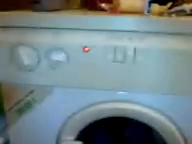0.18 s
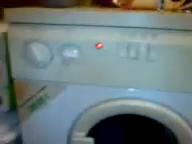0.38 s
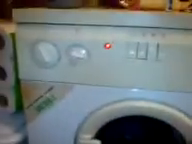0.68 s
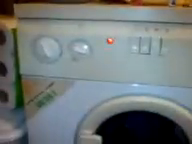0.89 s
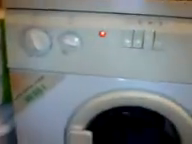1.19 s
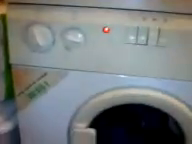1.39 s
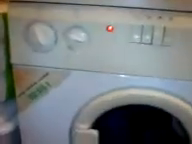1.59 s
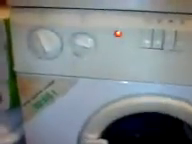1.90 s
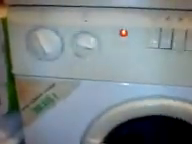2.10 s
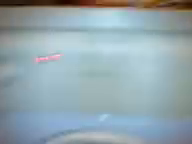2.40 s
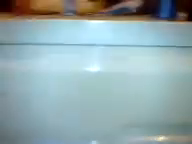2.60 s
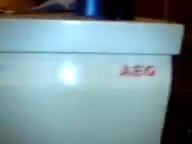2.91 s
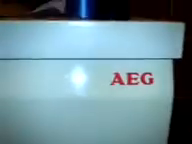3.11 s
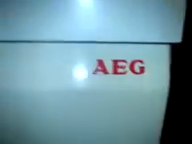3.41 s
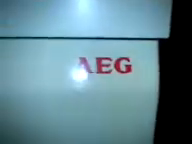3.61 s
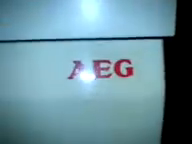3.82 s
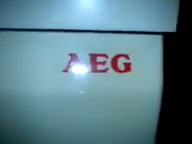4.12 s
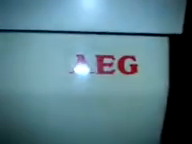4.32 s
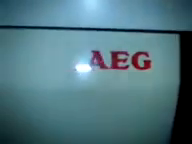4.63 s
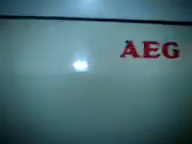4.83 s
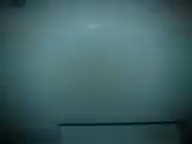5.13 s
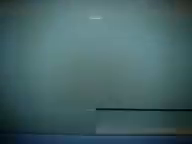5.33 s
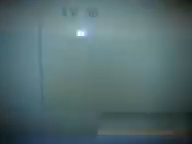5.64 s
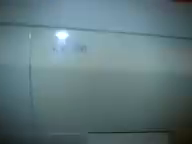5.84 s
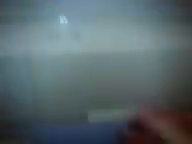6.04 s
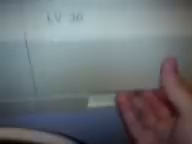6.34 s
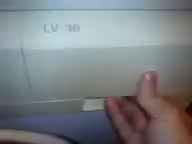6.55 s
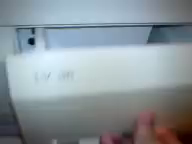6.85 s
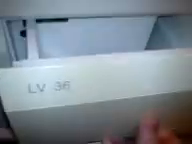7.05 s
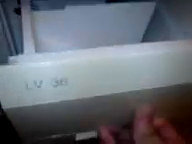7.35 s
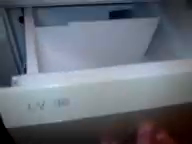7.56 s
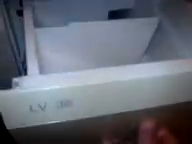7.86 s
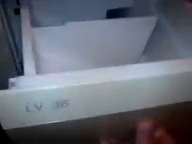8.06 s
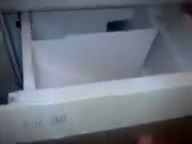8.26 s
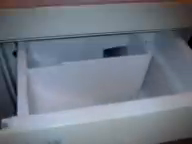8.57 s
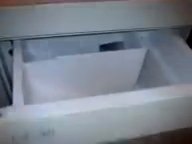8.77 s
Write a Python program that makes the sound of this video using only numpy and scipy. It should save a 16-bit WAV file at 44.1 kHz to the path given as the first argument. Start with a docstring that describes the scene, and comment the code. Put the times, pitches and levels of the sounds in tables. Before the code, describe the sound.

A washing machine fills indoors, heard close through a narrow, dull-topped microphone moving along its front. A steady, whistling inlet hiss dominates, with fizzing jets and low gurgling that slowly grow. The splash dims near the closed detergent drawer, then the drawer jerks open with a hollow plastic knock and short rattle, letting out fuller spattering and drumming water.

```python
"""Washing machine filling

A washing machine fills with mains water, heard by a microphone that moves along its front.
The inlet valve hisses and rings, and the cabinet passes the hiss on. Jets fizz and spatter in the plastic
detergent drawer; water gurgles down to the tub. Near 7 s a hand pulls the drawer open with a knock.
The narrow-band microphone rounds the loudest peaks; faint sharp ticks lie above its band.
Noise and impacts drive resonances, decaying tones make bubbles and knocks, tables set the levels."""
import sys
import numpy as np
from scipy import signal
from scipy.fft import rfft, irfft, next_fast_len
from scipy.io import wavfile

SR = 44100
rng = np.random.default_rng(int(sys.argv[2]) if len(sys.argv) > 2 else 0)


def to_wav(s):
    """Save 16-bit WAV."""
    ch = np.atleast_2d(s).T  # columns
    pcm = np.round(np.clip(ch, -1, 1) * 32767)  # PCM
    wavfile.write(sys.argv[1], SR, pcm.astype(np.int16))


N = 392490
TIME = np.arange(N) / SR

# resonances of valve, cabinet, hose, jet hollow, wet tray: (centre [Hz], width [Hz], relative level [dB])
VALVE_RESONANCES = [(2938, 45, -6), (3062, 75, -4.5), (3155, 60, -5), (3236, 30, -.5), (3281, 28, 0),
                    (3372, 80, -7.5)]
CABINET_RESONANCES = [(2160, 120, -1), (2240, 90, -2.5), (2315, 25, -.5), (2362, 30, -.5), (2455, 130, -4)]
HOSE_RESONANCES = [(2650, 43, 0.5), (2738, 450, -2.5)]
HOLLOW_RESONANCES = [(1494, 92, -7), (1625, 120, -3), (1754, 54, -4), (1885, 36, 1), (1979, 34, -0.5)]
TRAY_RESONANCES = [(610, 160, -12.5), (1000, 81, -4), (1160, 170, -6)]
# modes of the plastic drawer: (frequency [Hz], relative level [dB], t60 [s])
DRAWER_RESONANCES = [(269.6, -5.5, 0.08), (356, -6.5, 0.09), (496, 2.5, 0.12), (596, -4, 0.2),
                     (704, 3.5, 0.075), (900, -3, 0.056), (1114, -3, 0.086), (1338, -3.5, 0.073),
                     (1550, -9.5, 0.076)]
# valve loudness at the moving microphone, before sputter: (time [s], level [dB])
VALVE_LEVEL_DB = [(0, -20.5), (.55, -16), (.7, -19), (2, -20.5), (3.1, -17), (3.42, -15), (3.7, -17),
                  (4.05, -15), (4.92, -14.5), (5.6, -20), (5.92, -18.5), (6.06, -16), (6.35, -14.5),
                  (6.7, -17), (6.95, -15.5), (7.9, -16), (8.4, -17.5), (8.9, -15.5)]
# cabinet panel loudness at the moving microphone, before sputter: (time [s], level [dB])
CABINET_LEVEL_DB = [(0, -20.5), (2.7, -21), (3.25, -27), (5, -25), (5.85, -26), (6.02, -17.5), (6.17, -28),
                    (8.9, -25.5)]
# spectra of splash, tub, microphone, ticks: (frequency [Hz], gain [dB])
SPLASH_SPECTRUM = [(200, -21), (500, -9.5), (850, -4), (1150, -1.5), (1350, -1.5), (1700, -8), (2300, -8.5),
                   (3500, 0), (4600, -6)]
TUB_SPECTRUM = [(15, -46.5), (30, -28.5), (45, -16), (70, -5.5), (120, -4), (200, -4.5), (280, -5),
                (360, 1), (470, 1), (600, 4.5), (800, 1), (1200, -13), (3000, -28.5)]
MIC_SPECTRUM = [(10, -23), (40, -1.5), (3380, 0.5), (3600, -6), (3800, -10), (4000, -14), (4300, -20.5),
                (4600, -34.5), (4900, -66), (5500, -86)]
TICK_SPECTRUM = [(2500, -28), (4500, 15.5), (6000, 8), (9500, 8.5), (15000, 2.5)]
# blows that strike the drawer: (time [s], strength [dB])
DRAWER_BLOWS = [(6.775, -19), (6.984, -1), (6.989, -9), (6.997, -11), (7.008, -17), (7.029, -13),
                (7.055, -13), (7.829, -19)]
# clicks ahead of the tick spectrum: (time [s], level [dB])
TICK_CLICKS = [(0.509, -32), (0.5232, -26), (0.9223, -40), (1.543, -33.5), (3.2017, -32.5), (3.3593, -34),
               (3.937, -34), (3.9527, -28), (4.0023, -34), (4.139, -36.5), (4.4835, -20), (4.5306, -21.5),
               (4.703, -40), (4.8803, -38), (4.904, -19), (4.9625, -29), (5.0292, -30.5), (5.0817, -35),
               (6.0396, -28.5), (6.4348, -34), (6.8264, -39), (6.989, -19.5), (6.9977, -26),
               (7.1928, -32.5), (7.228, -32), (7.8989, -43), (7.9214, -30), (8.8566, -34.5)]

# levels before flicker; spray, splash and gurgle at the start
HOSE_DB, TRAY_DB = -26.5, -34
SPRAY_DB, SPLASH_DB, GURGLE_DB = -27.5, -20.5, -33.5
# the water grows louder as the machine fills
SPLASH_DB_PER_S, GURGLE_DB_PER_S = 0.5, 0.5763
# the microphone comes up to the closed drawer front, which screens the jets
SHADE_S, SHADE_FADE_S = 6.04, 0.16
SPRAY_SHADE_DB, SPLASH_SHADE_DB = -5, -5.5
# the drawer comes free and lets the water be heard
PULL_S, PULL_FADE_S = 6.97, 0.1
SPLASH_PULL_DB, GURGLE_PULL_DB = 4, 0.65
# the drawer is far enough out to bare its tray
OPEN_S, OPEN_FADE_S = 7.6, 0.61
CEILING = 0.72  # amplitude limit of the microphone
TOP_HZ = 15900


def valve(valve_db, cabinet_db):
    """The jet in the valve sputters quickly and rings the hose; the cabinet radiates its lower part."""
    sputter = undb(0.72 * walk(110) + 0.45 * walk(22))
    direct = ring(VALVE_RESONANCES, flicker_db=1.83) * undb(valve_db)
    panels = ring(CABINET_RESONANCES, flicker_db=1.5) * undb(cabinet_db)
    hose = ring(HOSE_RESONANCES, flicker_db=2.9) * undb(HOSE_DB)
    return sputter * (direct + panels + hose)


def spray(level_db):
    """The jets fizz in the hollow above the drawer and ring it."""
    return ring(HOLLOW_RESONANCES, flicker_db=3.0) * undb(level_db)


def splash(level_db):
    """The jets break into dense drops on the drawer walls: impacts plus turbulent noise."""
    drops = patter(rate_hz=2500, spread_db=3.5) + 0.89 * rng.standard_normal(N)
    return unit(colour(drops, SPLASH_SPECTRUM)) * undb(level_db + 1.8 * walk(18))


def drawer():
    """The drawer jerks free of its catch and rattles out: blows excite decaying modes and a diffuse tail."""
    t = np.arange(SR // 3) / SR
    body = np.zeros(len(t))
    for hz, db, t60_s in DRAWER_RESONANCES:
        decay = np.exp(-np.log(1000) * t / t60_s)
        body += undb(db) * np.sin(2 * np.pi * hz * t) * decay
    # plastic on plastic is a soft contact: the ring builds up over 0.8 ms
    body *= 1 - np.exp(-t / 0.0008)
    body /= np.abs(body).max()

    # the hollow casing adds a short diffuse tail
    hollow = resonate(rng.standard_normal(len(t)), 730, 800)
    hollow = resonate(hollow, 700, 1100)
    casing = unit(hollow) * np.exp(-np.log(1000) * t / 0.077)

    blows = np.zeros(N)
    for time_s, db in DRAWER_BLOWS:
        blows[int(time_s * SR)] += undb(db)
    return signal.fftconvolve(blows, body + undb(-8.5) * casing)[:N]


def tray():
    """Once the drawer is open, the jets drum unevenly on its wet tray and ring it."""
    level = undb(TRAY_DB + 0.69 * walk(18))
    return ramp(OPEN_S, OPEN_FADE_S) * ring(TRAY_RESONANCES, flicker_db=7.5) * level


def gurgle(level_db):
    """Water tumbles down the hose: bubbles over a churning rumble in the tub."""
    churn_noise = rng.standard_normal(N) * undb(2.5 * walk(26))
    churn = unit(colour(churn_noise, TUB_SPECTRUM))
    air = unit(colour(bubbles(count=1300), TUB_SPECTRUM))
    return churn * undb(level_db - 1.0) + air * undb(level_db - 4.5)


def bubbles(count):
    """Trapped air rings for some cycles, rising in pitch as it nears the surface."""
    out = np.zeros(N + SR)
    t = np.arange(SR // 12) / SR
    for when, pitch, life, size in rng.random((count, 4)):
        hz = 230 * 4.2 ** pitch
        fade_s = (0.58 + 4 * life) / hz
        phase = 2 * np.pi * hz * (t + 0.027 * t ** 2 / fade_s)
        tone = np.exp(-t / fade_s) * np.sin(phase)
        start = int(when * N)
        out[start:start + len(t)] += undb(15 * size ** 3) * tone  # few are large
    return unit(out[:N])


def reflections(x, count, strength):
    """Echoes off the machine, floor and walls; each path changes as the microphone moves."""
    paths_s = rng.uniform(0.006, 0.04, count)
    echoes = sum(delay(x, SR * (path_s + 0.0001938 * walk(1.2))) for path_s in paths_s)
    return unit(x + strength * echoes) * x.std()


def ticks():
    """Faint sharp ticks above the band of the hiss; a weaker second click gives each its own colour."""
    clicks = np.zeros(N)
    variations = rng.random((len(TICK_CLICKS), 2))
    for (time_s, db), (gap, share) in zip(TICK_CLICKS, variations):
        second_s = time_s + 0.0001 + 0.0006 * gap
        clicks[int(time_s * SR)] += undb(db)
        clicks[int(second_s * SR)] -= 0.6 * share * undb(db)
    return colour(clicks, TICK_SPECTRUM)


def ring(modes, flicker_db):
    """Dense tiny impacts and turbulence drive each resonance; its strength flickers with the flow."""
    impacts = patter(rate_hz=3500, spread_db=0.5)
    out = np.zeros(N)
    for hz, width_hz, db in modes:
        drive = 0.5 * impacts + rng.standard_normal(N)
        band = resonate(resonate(drive, hz, width_hz), hz, 1000)  # wide second pass trims the skirts
        out += band * undb(db + flicker_db * walk(6))
    return unit(out)


def patter(rate_hz, spread_db):
    """Tiny impacts at random moments, of random sign and strength; rms 1."""
    hits = rng.random(N) < rate_hz / SR
    strength = rng.standard_normal(N) * undb(spread_db * rng.standard_normal(N))
    return unit(hits * strength)


def walk(rate_hz):
    """Smooth random course through rate_hz new values a second; spread near 1."""
    steps = signal.resample(rng.standard_normal(2048), 16384)  # 8 points a value
    return np.interp(TIME * rate_hz, np.arange(len(steps)) / 8, steps)


def resonate(x, hz, width_hz):
    """One resonance, gain 1 at its centre."""
    b, a = signal.iirpeak(hz, hz / width_hz, fs=SR)
    return signal.lfilter(b, a, x)


def colour(x, points):
    """Filter by a spectrum of (frequency [Hz], gain [dB]) points, interpolated over log frequency."""
    hz, db = np.transpose(points)
    size = next_fast_len(N + SR // 10)
    bins_hz = np.maximum(np.fft.rfftfreq(size, 1 / SR), 1)
    gain = undb(np.interp(np.log(bins_hz), np.log(hz), db))
    return irfft(rfft(x, size) * gain, size)[:N]


def delay(x, lag_samples):
    """Read x a changing number of samples late."""
    n = np.arange(N)
    return np.interp(n - lag_samples, n, x)


def curve(points):
    """A table of (time [s], value) points as a value per sample."""
    return np.interp(TIME, *np.transpose(points))


def ramp(start_s, length_s):
    """A change from 0 to 1 that begins at start_s."""
    return np.clip((TIME - start_s) / length_s, 0, 1)


def undb(db):
    """Decibels to gain."""
    return 10 ** (np.asarray(db) / 20)


def unit(x):
    """Scale to rms 1."""
    return x / np.sqrt(np.mean(x ** 2))


def scene():
    """Hiss with shifting echoes; the water swells, the drawer front screens its jets, then lets it out."""
    shaded = ramp(SHADE_S, SHADE_FADE_S)
    pulled = ramp(PULL_S, PULL_FADE_S)
    spray_db = SPRAY_DB + SPRAY_SHADE_DB * shaded
    splash_db = SPLASH_DB + SPLASH_DB_PER_S * TIME + SPLASH_SHADE_DB * shaded + SPLASH_PULL_DB * pulled
    gurgle_db = GURGLE_DB + GURGLE_DB_PER_S * TIME + GURGLE_PULL_DB * pulled

    direct = valve(curve(VALVE_LEVEL_DB), curve(CABINET_LEVEL_DB)) + spray(spray_db)
    hiss = reflections(direct, count=5, strength=0.25)
    mix = hiss + splash(splash_db) + drawer() + tray() + gurgle(gurgle_db)
    return mix[None]


def record(dry):
    """The microphone rounds the loudest peaks and passes only a narrow band; faint ticks lie above it."""
    rounded = dry[0] / (1 + (dry[0] / CEILING) ** 10) ** (1 / 10)
    heard = colour(rounded, MIC_SPECTRUM) + ticks()
    lowpass = signal.ellip(8, 0.2, 70, TOP_HZ, fs=SR, output="sos")
    return signal.sosfilt(lowpass, heard)[None]


dry = scene()
out = record(dry)
to_wav(out)
```